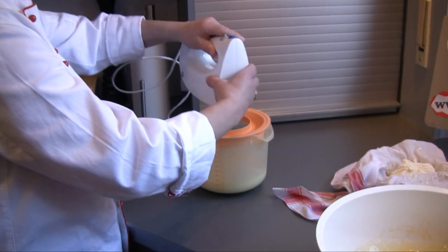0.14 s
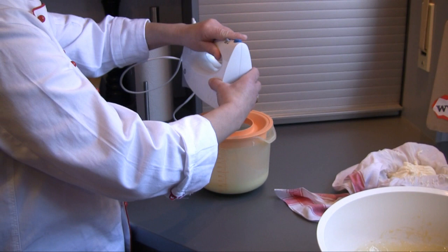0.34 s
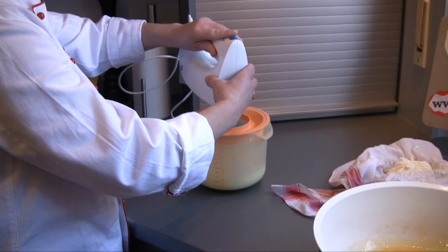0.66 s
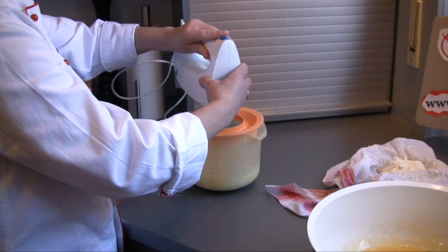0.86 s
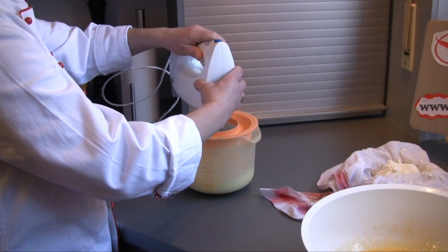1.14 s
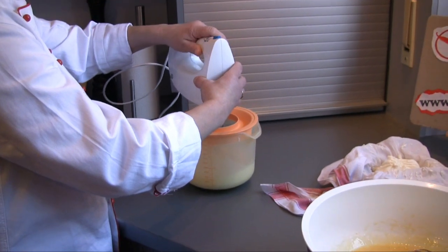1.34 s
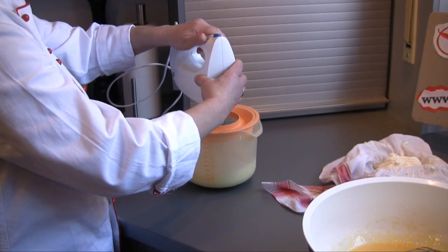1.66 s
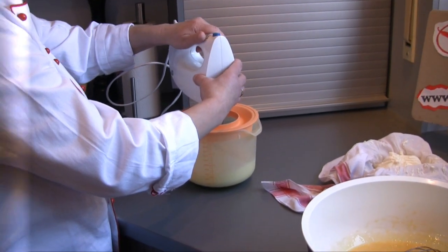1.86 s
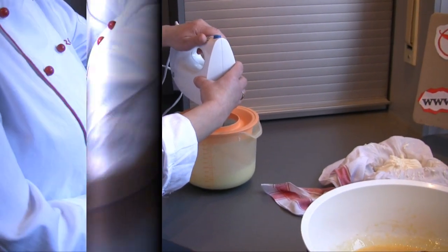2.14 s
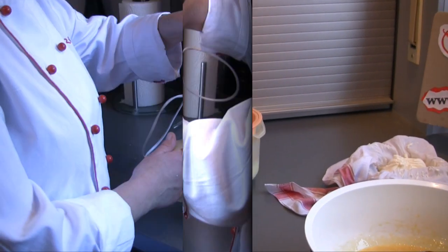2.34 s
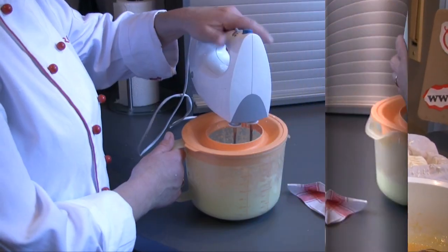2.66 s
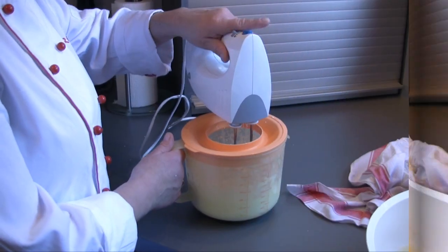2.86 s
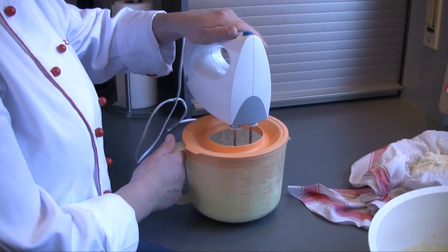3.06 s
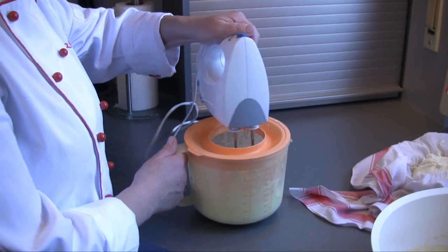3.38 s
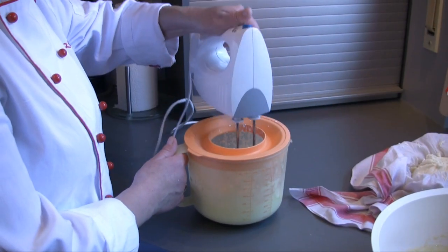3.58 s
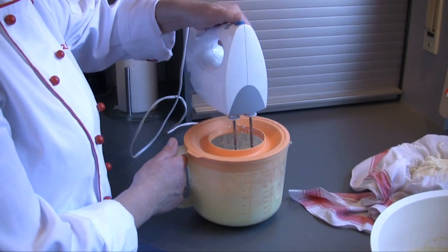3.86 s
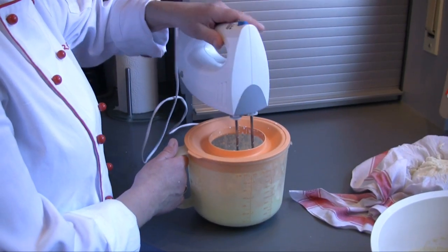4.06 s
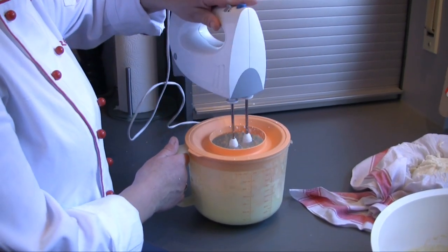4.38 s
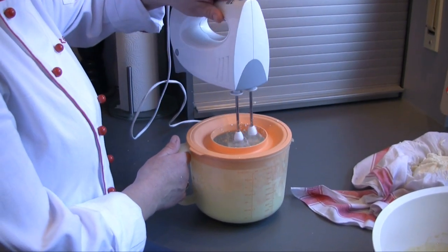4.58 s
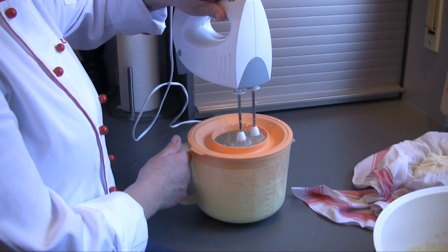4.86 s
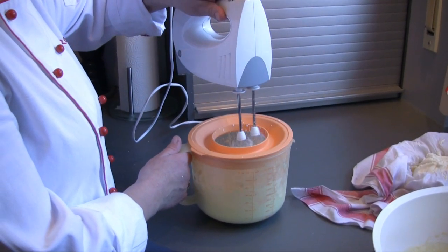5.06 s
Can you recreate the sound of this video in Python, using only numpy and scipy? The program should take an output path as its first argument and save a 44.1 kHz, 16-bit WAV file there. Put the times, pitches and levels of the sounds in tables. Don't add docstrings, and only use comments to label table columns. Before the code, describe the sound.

A quiet kitchen with faint mains hum, heard close and nearly mono. At about 0.1 s a switch is pushed; a hand mixer's motor hums and spins up quickly, its beaters knocking the wall of a cream-filled plastic jug in irregular bumps until 0.7 s. By 0.9 s it runs steadily: a loud, full, hollow churning roar with fast pulsing and a buzzy brush whine. At 2.4 s the sound cuts abruptly to a slower, thinner and quieter run, dipping slightly, then rising around 2.9 s. Sharp switch clicks come at 3.25-3.3 s and the whir slides down in pitch, fading to rest by 3.95 s. Near silence follows, with one tiny tick. At 4.3 s soft clicks restart the motor, which revs up within a few tenths. From 4.7 s the lifted beaters hit the lid, growing into a very loud, rapid, bright plastic clatter of some forty-five blows per second until the end at 5.2 s.

```python
import sys
import numpy as np
from scipy import signal
from scipy.fft import rfft, irfft, next_fast_len
from scipy.io import wavfile
from scipy.ndimage import uniform_filter1d, map_coordinates

SR = 44100
rng = np.random.default_rng(int(sys.argv[2]) if len(sys.argv) > 2 else 0)


def how_loud(loudness_db):
    steps = np.asarray(loudness_db, float) / 20
    return 10 ** steps


def file_out(sig):
    cols = np.atleast_2d(sig).T
    lim = np.clip(cols, -1, 1)
    pcm = np.round(lim * 32767).astype(np.int16)
    wavfile.write(sys.argv[1], SR, pcm)


N = 230376

# (frequency [Hz], level per Hz [dB])
ROOM_COLOUR = [(8.8, -46), (15, -6.5), (44, -1), (60, -16), (84, -15), (103, 6), (116, -13), (130, -20.5),
               (1340, -31), (3220, -33), (16000, -38)]
ROOM_DB = -55.5
# (frequency [Hz], rms level [dB])
HUM = [(49.6, -57.5), (99.6, -58), (148.5, -73), (198.5, -76)]
# (frequency [Hz], side level against mid [dB])
WIDTH = [(20, -13), (60, -14), (125, -18), (250, -24), (500, -33), (1000, -40), (16000, -46)]

PRESS = [
    (0.094, -29.5, 2),
]
BUMPS = [(0.173, -25, -3.5), (0.207, -26.5, -5), (0.246, -23.5, -12), (0.286, -17.5, -9.5),
         (0.314, -18, -21), (0.367, -25.5, -2), (0.388, -18, -10), (0.439, -39, -6), (0.481, -24, -5),
         (0.571, -19, -16), (0.586, -26, -12), (0.641, -24, -4), (0.691, -19.5, -14), (0.71, -17.5, -31)]
SWITCH = [
    (3.248, -22.5, -9),
    (3.275, -17, -25),
    (3.297, -27, -18),
    (3.31, -29.5, -5),
    (4.311, -32.5, 2.5),
    (4.329, -37.5, 9.5),
    (4.351, -41, 9.5),
    (4.372, -40, 8),
]
TICK = [
    (4.0195, -51, -40),
]
RATTLE = [(4.6903, -25.5, -9), (4.734, -18.5, -4.5), (4.755, -14.5, -8), (4.827, -17, -5.5),
          (4.8452, -11, -14), (4.8673, -14.5, -5.5), (4.8918, -15.5, -7.5), (4.9178, -21, -12),
          (4.9318, -12.5, -8), (4.9535, -7, -5.5), (4.9783, -11.5, -8), (5.0019, -11.5, -6),
          (5.0187, -5, -9), (5.039, -4.5, -14), (5.0663, -11.5, -8.5), (5.0896, -9, -6.5),
          (5.1111, -8.5, -10), (5.1297, -8, -8), (5.1525, -7, -9.5), (5.1753, -8, -9.5),
          (5.1995, -5.5, -14)]

PLASTIC = [(1110, 3, 0.036), (1605, -9, 0.015), (2570, -3, 0.0086), (3275, 8, 0.016), (4370, -18, 0.0067)]
CASE = [(418, -7, 0.034), (608, -1, 0.05), (705, -2, 0.056), (875, -6, 0.047), (1023, -5.5, 0.056)]
WALL = [(750, -3, 0.02), (1054, 0, 0.018), (1330, 1, 0.035), (1900, -9, 0.012), (2530, 2, 0.0092),
        (3180, -1, 0.014)]
FULL_JUG = [(242, -1.5, 0.068), (300, -2, 0.082), (411.4, 2.5, 0.1), (467, -2, 0.087)]
LID = [(1300, -6, .015), (2000, -6, .015), (3150, -1, .034), (3600, -4, .012), (4100, -1, .018),
       (4450, -1, .016), (4900, -4, .01), (5600, -3, .01), (6200, -4, .008)]
LID_THUD = [(297, 4, 0.061), (417, 0, 0.061), (490, 2.5, 0.047), (620, 5, 0.03), (795, -19, 0.089)]
SIZZLE = [(7800, -2, .007), (9500, -1, .007), (11700, 0, .008), (13300, -4, .006), (15000, -9, .006)]

# (frequency [Hz], level per Hz [dB])
CHURN_COLOUR = [(24, -42), (40, -10.5), (203, -18.5), (236, -11), (335, -10.5), (361, -6), (409, 0.5),
                (595, -11), (783, -10.5), (1110, -6), (2800, -8), (3420, -3), (4280, -21.5), (12500, -31.5),
                (16500, -38.5)]
COAST_COLOUR = [(30, -41), (60, -1), (170, -12), (380, -5.5), (1500, -4.5), (1850, -10.5), (3200, -5.5),
                (6000, -21), (8000, -18), (12000, -21), (14500, -20), (16500, -27)]
RESTART_COLOUR = [(30, -27), (90, -16), (280, -8), (1000, 0.5), (1600, -8), (2000, -1.5), (2500, -5),
                  (3200, -1), (6000, -16), (8300, -13), (12000, -16), (14500, -16), (16500, -22)]
# (frequency [Hz], width [Hz], level over the colour [dB])
DEEP_JUG = [(242, 14, 3), (311, 10, 7), (388.8, 12, 9), (800, 32, 10.5), (1080, 160, 4.5), (1342, 43, 4),
            (1570, 114, 5.5), (1937, 27, 9), (3190, 1600, -8), (12700, 900, 5), (15700, 250, 4)]
HOUSING = [(263, 140, 7.2), (1110, 47, 2), (1520, 320, 3.6), (2020, 200, 5.4), (3260, 280, 5.1),
           (4300, 2000, 0.83), (4830, 400, 1.2), (9850, 450, 7.5), (11100, 870, 5), (12900, 1300, 7.8)]
SQUEAL = [(950, 600, 21), (3900, 400, 19), (6850, 650, 26)]
# (frequency [Hz], width [Hz], level over the whine [dB])
GEAR_RING = [(1210, 50, 2), (1575, 140, 10.5), (3150, 120, -7), (6870, 200, -3)]
# (frequency [Hz], rms level [dB])
BEATER_TONES = [(296.1, -48), (371.4, -36), (414.5, -38), (452.2, -43), (479.1, -41), (543.7, -48),
                (667.5, -49), (742.9, -46), (807.5, -41), (882.9, -48), (931.3, -43), (1007, -46),
                (1071, -39), (1130, -38), (1238, -47), (1335, -45), (1583, -44), (1690, -47)]
# (multiple of the shaft turn [1], level [dB])
GEAR_TONES = [(18, 0), (20, 0), (40, 0), (102, 0)]
# (frequency [Hz], level [dB])
WHINE_FAST = [(2600, -30), (5200, -3), (7800, -3), (10400, -2), (13000, -11), (15600, -14), (17000, -30)]
WHINE_SLOW = [(1500, -30), (3600, -20), (4700, -8), (5200, -2), (5800, -18), (7200, -20), (8100, -6),
              (8700, -12), (9300, -4), (9800, 1), (11300, 2), (12100, -3), (12900, -9), (13200, -2),
              (14500, -18), (17000, -30)]
# (time [s], speed [turns/s])
CHURN_SPEED = [(.168, 25), (.3, 58), (.5, 86), (.64, 99), (.75, 104.5), (.9, 108.1), (1.05, 108.45),
               (2.418, 108.7)]
COAST_SPEED = [(2.419, 72), (2.55, 70.3), (2.66, 67.4), (2.83, 67.2), (2.93, 76.8), (3.01, 78.9),
               (3.13, 78.8), (3.234, 71.3)]
# (level at top speed [dB], loss per halving of speed [dB], share of top speed where growth stops [1])
CHURN_LAW = [(-25.5, 10, 1), (-33, 15.5, 1), (-42.5, 8.5, 1), (-64, 1, 1), (-55.5, 10, 0.96), (0, 16, 1)]
COAST_LAW = [(-34.5, 14.7, 0.98), (-47.5, 14.5, 1), (-48, 7.7, 0.78), (-50.5, 14, 0.47), (-54, 15, 0.57),
             (0.5, 1, 0.42)]
RESTART_LAW = [(-35, 18, 1), (-47.5, 25, 1), (-50, 5.5, .9), (-46, 5.6, 0.99), (-53.5, 13, 0.96),
               (3, 2.7, 0.69)]
LIFT_DB = [4.5, 5, 2.5, -8, -6, 1.5]

FULL_SPEED, SLOW_SPEED, KICK_SPEED = 108.6, 79, 12
PRESS_S, OFF_S, REST_S, ON_S, END_S = 0.079, 3.234, 3.95, 4.312, 5.224
BRAKE, BRAKE_EASE, OFF_WHINE_DB = 104, 18, -7
SPIN_UP_S, LIFT_S, LIFT_RAMP_S = .092, 4.84, .13
STRAIN_DB, STRAIN_RISE_DB, FULL_SLIP, RUB_HUM_DB = -60, 9, .2, -47
BOOM_HZ = 507
FLAT = [(0, 0), (SR, 0)]


def evened(x):
    return x / np.sqrt(np.mean(x ** 2) + 1e-20)


def read(points, hz):
    f, value = np.transpose(points)
    return np.interp(np.log(hz + 1), np.log(f + 1), value)


def columns(rows, t):
    s, *values = np.transpose(rows)
    return [np.interp(t, s, v) for v in values]


def add(mix, s, sound):
    part = mix[round(s * SR):][:len(sound)]
    part += sound[:len(part)]


def drift(size, rate_hz):
    knots = rng.standard_normal(int(size * rate_hz / SR) + 4)
    return map_coordinates(knots, [np.arange(size) * rate_hz / SR + 1], order=3)


def resonance(hz, centre_hz, width_hz):
    return 1 / (1 + (2 * (hz - centre_hz) / width_hz) ** 2)


def coloured(x, colour, modes=(), lo_hz=0, hi_hz=30000):
    size = next_fast_len(len(x))
    hz = np.fft.rfftfreq(size, 1 / SR)
    db = read(colour, hz) + sum(d * resonance(hz, f, w) for f, w, d in modes)
    edges = 1 / np.sqrt((1 + (lo_hz / (hz + 1)) ** 12) * (1 + (hz / hi_hz) ** 12))
    return irfft(rfft(x, size) * how_loud(db) * edges, size)[:len(x)]


def background():
    t = np.arange(N) / SR
    room = coloured(rng.standard_normal(N), ROOM_COLOUR, [(54.4, 6.6, -7), (105, 21, -17.0)])
    sound = how_loud(ROOM_DB) * evened(room)
    slip = .02 * drift(N, 6)
    for k, (_, db) in enumerate(HUM):
        phase = 2 * np.pi * (k + 1) * (HUM[0][0] * t + slip)
        sound += how_loud(db + 1.5 * drift(N, 8)) * np.sqrt(2) * np.cos(phase)
    whistle = np.sin(2 * np.pi * 3150 * t + .8 * drift(N, 60))
    return sound + how_loud(-77 + 4 * drift(N, 20)) * whistle


def kitchen(x, t60):
    t = np.arange(SR // 3) / SR
    sparse = rng.choice([-1., 1.], len(t)) * (rng.random(len(t)) < .06)
    tail = sparse * how_loud(-60 * t / t60) * (t > .003)
    tail = coloured(tail, [(200, -2.5), (4000, 0), (12000, -4.5)])
    return signal.oaconvolve(x, tail / np.linalg.norm(tail))[:N]


def ring(modes, t60):
    t = np.arange(6000) / SR
    body = np.zeros(len(t))
    for hz, db, d in modes:
        fade = how_loud(db - 60 * t / (d * t60 / .05))
        body += rng.choice([-1, 1]) * fade * np.sin(2 * np.pi * hz * rng.uniform(.98, 1.02) * t)
    crack = (1 + .5 * rng.standard_normal(300)) * how_loud(-60 * t[:300] / .00015)
    sound = signal.oaconvolve(body, crack)
    return sound / abs(sound).max()


def knocks(events, modes, thud, sizzle_db, t60, scatter_db, bounce_db):
    out = np.zeros(N)
    t = np.arange(6299) / SR
    scatter_colour = [(300, -7.5), (900, 6.5), (3000, 0), (5500, -7), (7000, -13.5), (16000, -26)]
    for s, db, thud_db in events:
        bounce = rng.uniform(.004, .006), db + bounce_db + 1.5 * rng.standard_normal()
        for late, level_db in (0, db), bounce:
            scatter = rng.standard_normal(len(t)) * how_loud(scatter_db - 60 * t / t60)
            blow = ring(modes, t60) + coloured(scatter, scatter_colour)
            blow += how_loud(thud_db) * ring(thud, t60)
            blow += how_loud(sizzle_db) * ring(SIZZLE, t60)
            add(out, s + late, how_loud(level_db) * blow)
    return out


def plastic_blows():
    blows = knocks(SWITCH, PLASTIC, CASE, sizzle_db=-7, t60=0.043, scatter_db=2.5, bounce_db=-2.0)
    blows += knocks(BUMPS, WALL, FULL_JUG, sizzle_db=-20, t60=0.073, scatter_db=-8, bounce_db=-5)
    blows += knocks(RATTLE, LID, LID_THUD, sizzle_db=-11, t60=.04, scatter_db=-9, bounce_db=-5.5)
    blows += knocks(TICK, LID[1:2] + LID[3:], CASE, sizzle_db=-12, t60=.015, scatter_db=-3, bounce_db=-30)
    blows += knocks(PRESS, PLASTIC, FULL_JUG, sizzle_db=-17, t60=0.057, scatter_db=-3.5, bounce_db=-10)
    return signal.sosfilt(signal.butter(2, 110, "high", fs=SR, output="sos"), blows)


def tone(turns, order, level_db, waver_db, waver_rad):
    phase = 2 * np.pi * (order * turns + rng.random()) + waver_rad * drift(len(turns), 6.18)
    return how_loud(level_db + waver_db * drift(len(turns), 8.67)) * np.sqrt(2) * np.cos(phase)


def glide(points):
    t = np.arange(points[0][0], points[-1][0], 1 / SR)
    return t, uniform_filter1d(columns(points, t)[0], SR // 25, mode="nearest")


def layers(shaft, top, law, extra_db=np.zeros((6, 1))):
    levels = []
    for db, per_half, limit in law:
        share = np.minimum(shaft / top / np.clip(limit, .1, 1), 1)
        levels.append(db + per_half * np.log2(share))
    return levels + extra_db


def brush_whine(t, shaft, turns, whine_db, whine):
    out = np.zeros(len(t))
    uneven = 1 + .6 * np.cos(4 * np.pi * turns) + .6 * np.cos(3 * np.pi * turns + 1)
    for k in range(1, 30):
        hz = 24 * k * shaft
        level_db = np.where(hz < 17000, read(whine, hz) + 1.5 * drift(len(t), 25), -200)
        phase = 2 * np.pi * (24 * k * turns + rng.random()) + .8 * drift(len(t), 50)
        out += how_loud(whine_db + level_db + 2.5) * uneven * np.cos(phase)
    return out


def motor(t, shaft, levels, colour, modes, whine, repeat, blade_db, shaft_db, grain_db, flutter_db):
    rumble_db, rasp_db, hiss_db, squeal_db, whine_db, boom_db = levels
    turns = np.cumsum(shaft) / SR
    place = (turns / 7 % 1 * 4000).astype(int)
    patterns, blend = rng.standard_normal((2, 4000)), 1.5 * t
    same = np.cos(blend) * patterns[0, place] + np.sin(blend) * patterns[1, place]
    fresh = rng.standard_normal(len(t))
    splash = how_loud(grain_db * drift(len(t), 400) + flutter_db * drift(len(t), 30.25))
    pulse_db = blade_db * np.cos(2 * np.pi * turns * 4 / 7) + shaft_db * np.cos(2 * np.pi * turns)
    beat = splash * how_loud(pulse_db)
    churned = (np.sqrt(repeat) * same + np.sqrt(1 - repeat) * fresh) * beat
    stirred = fresh * beat
    out = how_loud(rumble_db) * evened(coloured(churned, colour, modes, hi_hz=2500))
    out += (how_loud(np.maximum(boom_db, -9)) - 1) * coloured(out, FLAT, lo_hz=218, hi_hz=BOOM_HZ)
    out += how_loud(rasp_db) * evened(coloured(stirred, colour, modes, lo_hz=2500, hi_hz=5500))
    out += how_loud(hiss_db) * evened(coloured(stirred, colour, modes, lo_hz=5500))
    out += how_loud(squeal_db) * evened(coloured(stirred, FLAT, SQUEAL))
    return turns, out + brush_whine(t, shaft, turns, whine_db, whine)


def stalled():
    t = np.arange(PRESS_S, CHURN_SPEED[0][0] + 0.014, 1 / SR)
    hum = tone(t, 100, STRAIN_DB + STRAIN_RISE_DB + 4, waver_db=1, waver_rad=1)
    return t[0], np.hanning(len(t)) ** .5 * hum


def churning():
    t, shaft = glide(CHURN_SPEED)
    levels = layers(shaft, FULL_SPEED, CHURN_LAW)
    turns, sound = motor(t, shaft, levels, CHURN_COLOUR, DEEP_JUG, WHINE_FAST,
                         repeat=.35, blade_db=1.7, shaft_db=1.2, grain_db=1.3, flutter_db=.7)
    locked_db = levels[0] + 26 - 25 * np.clip(1 - t / .95, 0, 1)
    for hz, db in BEATER_TONES:
        sound += tone(turns, hz / FULL_SPEED, db + locked_db, waver_db=1.5, waver_rad=0.58)
    lag = np.clip((1 - shaft / FULL_SPEED) / FULL_SLIP, 0, 1)
    return t[0], sound + tone(t, 100, STRAIN_DB + STRAIN_RISE_DB * lag, waver_db=2.5, waver_rad=4)


def slow_run(t, shaft, levels, colour):
    turns, sound = motor(t, shaft, levels, colour, HOUSING, WHINE_SLOW,
                         repeat=.1, blade_db=.8, shaft_db=.8, grain_db=1.0, flutter_db=.6)
    fast_enough = np.clip(shaft / 5 - 12, 0, 1)
    for k, db in GEAR_TONES:
        ringing = sum(how_loud(d) * resonance(k * shaft, hz, w) for hz, w, d in GEAR_RING)
        sound += ringing * fast_enough * tone(turns, k, levels[4] + db, waver_db=2.5, waver_rad=3.0)
    return t[0], sound


def coasting():
    _, shaft = glide(COAST_SPEED)
    off = np.arange(0, REST_S - OFF_S, 1 / SR)
    shaft = np.r_[shaft, shaft[-1] - BRAKE * off + BRAKE_EASE * off ** 2]
    t = COAST_SPEED[0][0] + np.arange(len(shaft)) / SR
    unpowered = np.outer([0, 0, 0, 0, OFF_WHINE_DB, 0], t > OFF_S)
    return slow_run(t, shaft, layers(shaft, SLOW_SPEED, COAST_LAW, unpowered), COAST_COLOUR)


def restarting():
    t = np.arange(ON_S, END_S, 1 / SR)
    shaft = SLOW_SPEED - (SLOW_SPEED - KICK_SPEED) * np.exp((ON_S - t) / SPIN_UP_S)
    lift = np.clip((t - LIFT_S) / LIFT_RAMP_S, 0, 1)
    levels = layers(shaft, SLOW_SPEED, RESTART_LAW, np.outer(LIFT_DB, lift))
    start, sound = slow_run(t, shaft, levels, RESTART_COLOUR)
    return start, sound + lift ** 2 * tone(t, 100, RUB_HUM_DB, waver_db=3.5, waver_rad=3)


def mixer():
    out = np.zeros(N)
    for run in stalled, churning, coasting, restarting:
        add(out, *run())
    return out


def scene():
    blows = plastic_blows()
    mid = mixer() + blows + how_loud(-6) * kitchen(blows, t60=0.3) + background()
    side = coloured(mid, WIDTH)
    side += 0.084 * np.gradient(mid)
    hiss_colour = [(20, 0), (60, -8), (200, -25), (2000, -45), (16000, -45)]
    side += how_loud(-62) * evened(coloured(rng.standard_normal(N), hiss_colour))
    return np.array([mid - side, mid + side])


def band_limit(x):
    return signal.sosfilt(signal.butter(12, 16980, fs=SR, output="sos"), x)


def record(dry):
    rounded = 0.59 * np.tanh(dry / 0.61)
    treble_cut = signal.firwin(401, 15850, window=("kaiser", 9), fs=SR)
    finished = signal.oaconvolve(rounded, treble_cut[None], "same")
    return band_limit(finished)


dry = scene()
out = record(dry)
file_out(out)
```